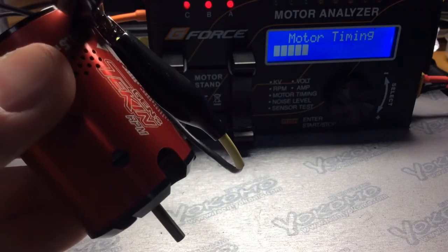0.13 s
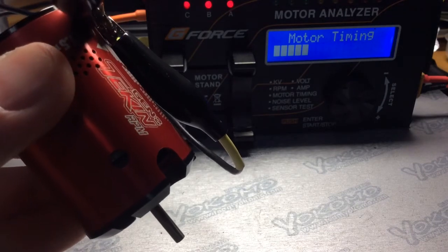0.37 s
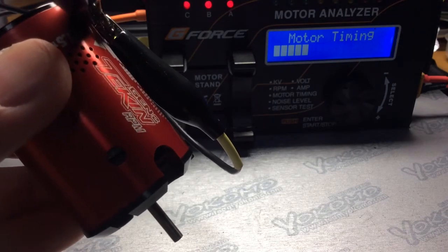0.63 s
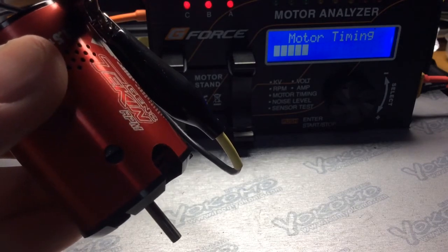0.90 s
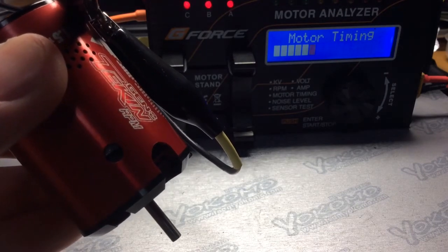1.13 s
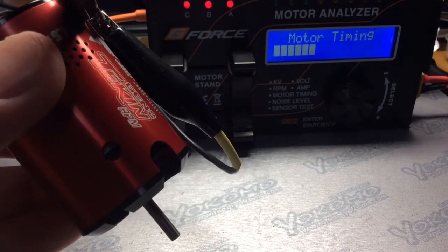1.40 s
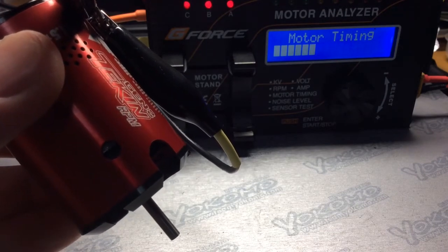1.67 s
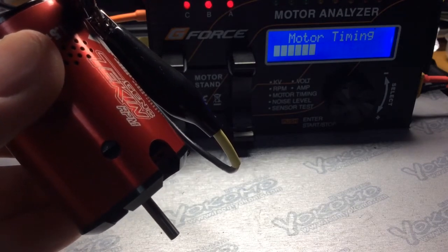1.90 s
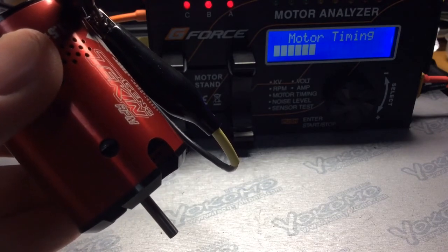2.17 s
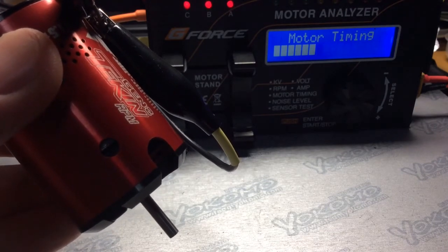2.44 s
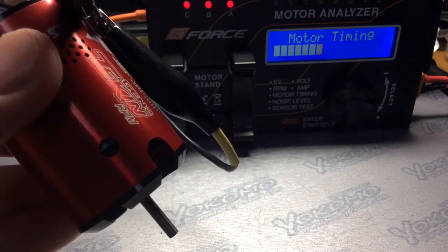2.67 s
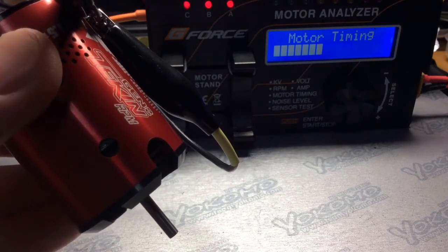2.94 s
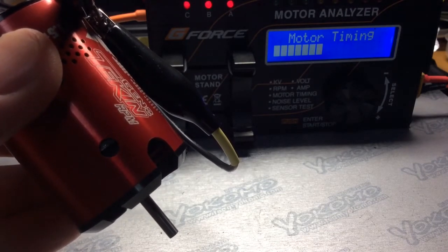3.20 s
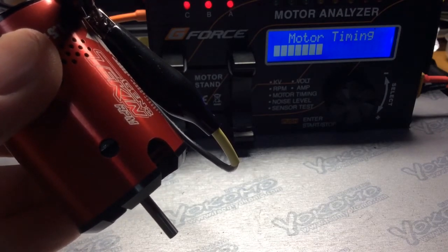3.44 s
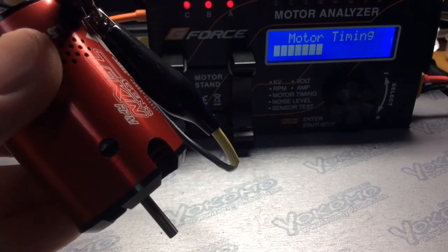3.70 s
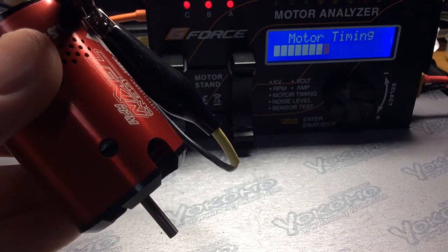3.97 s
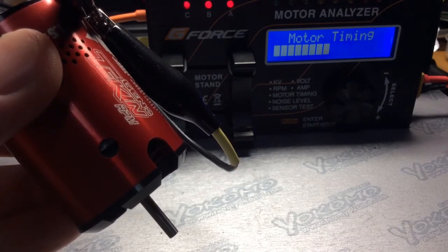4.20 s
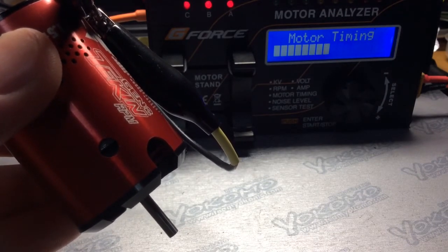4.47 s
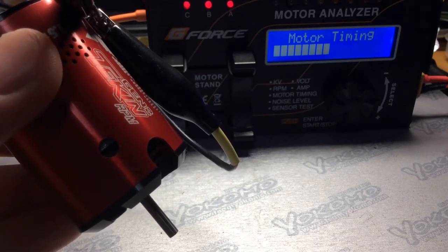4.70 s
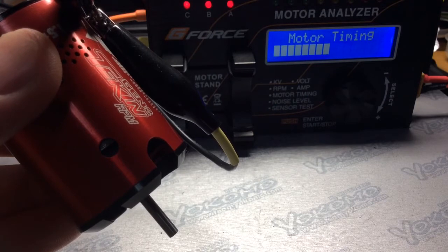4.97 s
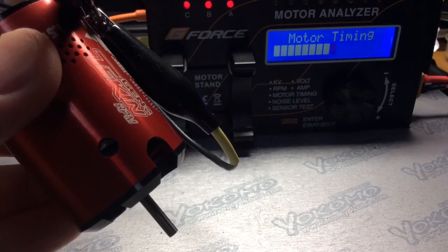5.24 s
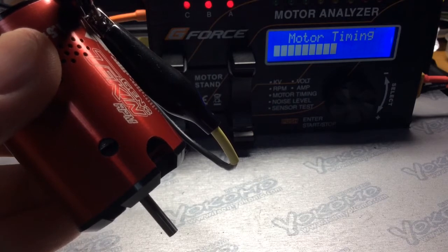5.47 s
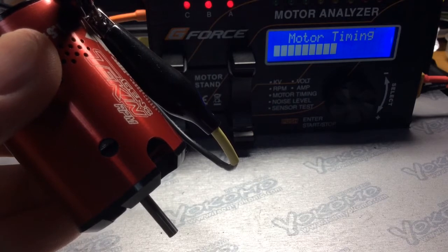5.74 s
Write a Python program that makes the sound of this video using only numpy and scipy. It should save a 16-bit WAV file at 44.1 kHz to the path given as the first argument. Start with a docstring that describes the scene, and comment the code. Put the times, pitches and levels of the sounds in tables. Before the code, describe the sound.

From 0 to about 6 seconds a small brushless motor, held close to the microphone, spins freely at a nearly constant speed of roughly 150 turns per second. The sound is already at full strength at the start and continues to the end without a ramp, click or pause. Shaft and ball bearings make its metal can ring in dense, slightly clashing combs of tones, strongest around 1 to 5 kHz, giving a gritty, metallic whine with rough beating and shimmer. In the first half second or so the bearing tones settle very slightly, then the speed only hunts minutely. Harsh rattling noise, strongest around 4 to 7 kHz, and airy hiss up to about 15 kHz throb rapidly with the rotor. A thin electrical whistle sits near 8 kHz. Behind it are weak low rumble and a very faint room hush fading over the seconds. Dry, close and centred mono.

```python
"""In a quiet room, a small brushless motor is held in a hand close to a mono microphone.
It runs unloaded at a nearly steady speed. The shaft and two ball-bearing rhythms ring the metal can as
combs of tones, and the drive's switching whistles near 8 kHz. Rattle and air hiss are coloured noise
that throbs with the turning rotor. A low rumble and a faint, fading hush fill the room behind."""
import sys
import numpy as np
from scipy import signal
from scipy.fft import rfft, irfft, next_fast_len
from scipy.io import wavfile
from scipy.ndimage import uniform_filter1d

SR = 44100
rng = np.random.default_rng(int(sys.argv[2]) if len(sys.argv) > 2 else 0)


def wav_out(sig):
    """Save sig, one row per channel (or a flat mono array), as 16-bit PCM at SR to the path in sys.argv[1]."""
    wavfile.write(sys.argv[1], SR, np.round(np.clip(np.atleast_2d(sig).T, -1, 1) * 32767).astype(np.int16))


def attenuation_scalar(level_db):
    """Turn a level in dB into a linear amplitude multiplier (20 dB per decade)."""
    decades = np.asarray(level_db, float) / 20
    return 10 ** decades


N = 258867  # length in samples

# the drive hunts gently around its set speed: start_s, shaft_speed_hz
SHAFT_SPEED = [(0, 150.87), (.3, 150.63), (.94, 150.61), (1.1, 150.66), (1.69, 150.52), (1.94, 150.72),
               (2.1, 150.43), (2.55, 150.63), (2.92, 150.85), (3.3, 150.54), (3.78, 150.92), (3.95, 150.6),
               (4.2, 150.89), (4.44, 150.53), (4.82, 150.93), (5.23, 150.5), (5.58, 150.8), (5.87, 150.7)]


def shaft_speed(t):
    """The shaft speed (Hz) moves in straight lines between the points of the table."""
    start_s, speed_hz = np.transpose(SHAFT_SPEED)
    return np.interp(t, start_s, speed_hz)


# the two bearing rhythms, as fractions of a shaft order:
# settled_share, extra_share at the start, settling_time_s, share_per_hz above the set speed
RACE_RHYTHM = (.65, .0085, 2.4, -.004)
SLIP_RHYTHM = (.195, .03, .35, .07)


def bearing_turns(t, hz):
    """Adds up the turns of the steady race and of the slipping race, whose balls skid quickly."""
    race_hz = hz * rhythm(t, hz, *RACE_RHYTHM)
    slip_hz = hz * rhythm(t, hz, *SLIP_RHYTHM)
    skids_hz = 1.476 * spread(slow(hz=11.8)[0])
    return np.cumsum(race_hz) / SR, np.cumsum(slip_hz + skids_hz) / SR


def rhythm(t, hz, settled, extra, settle_s, per_hz):
    """A bearing rhythm settles with time and leans with each swing of the speed."""
    set_hz = 150.67
    return settled + extra * np.exp(-t / settle_s) + per_hz * (hz - set_hz)


# combs of can tones, one entry per shaft order going up: level_db (rms of each tone)
SHAFT_TONES = [-79.5, -74.9, -95.9, -87.1, -78.7, -65.8, -74.4, -65.8, -66.9, -56.5, -61.5, -70.2, -80.6,
               -67.4, -72.1, -73.5, -78.8, -75.4, -92.9, -74.3, -92.9, -80.1, -78.3, -79.9, -85.0, -72.4,
               -83.0, -84.2, -81.1, -74.2, -68.9, -84.2, -67.8, -84.0, -76.4, -74.1]
# the same, shifted by one, two or three times the steady race rhythm: level_db
RACE_TONES = [-101.1, -81.3, -96.3, -78.9, -81.5, -64.1, -74.2, -61.1, -69.7, -60.6, -80.0, -62.5, -63.7,
              -61.9, -66.2, -68.7, -72.7, -64.4, -76.9, -74.4, -74.5, -73.4, -62.8, -62.5, -61.0, -71.7,
              -62.3, -71.9, -66.4, -80.6, -65.5, -72.8, -71.9, -82.8, -69.4, -76.5, -84.0, -71.8, -80.9,
              -75.6, -70.3, -82.0, -73.7, -83.5, -70.3]
RACE_TWICE_TONES = [-72.9, -79.9, -74.4, -76.3, -79.8, -74.6, -76.9, -81.8, -84.3, -74.6, -69.1, -62.1,
                    -84.1, -85.1, -62.2, -74.9, -76.0, -80.6, -68.7, -69.9, -64.1, -64.1, -65.6, -78.4,
                    -62.6, -65.3, -62.3, -74.7, -61.3, -81.4, -68.5, -84.3, -68.6, -72.7, -83.9]
RACE_THRICE_TONES = [-74.5, -74.2, -73.1, -70.3, -72.5, -71.3, -84.9, -77.9, -85.7, -81.3, -83.5, -81.1,
                     -71.9, -83.2, -73.4, -78.9, -84.2, -77.3, -76.4, -73.1, -75.7, -86.0, -86.4]
# the same, shifted by the slipping race rhythm, alone or mixed with the steady one: level_db
RACE_LESS_SLIP_TONES = [-97.8, -97.8, -78.1, -85.0, -72.1, -90.1, -71.7, -80.1, -88.5, -89.4, -88.9, -82.0,
                        -82.9, -91.3, -89.0, -94.6]
SLIP_TONES = [-96.0, -95.1, -82.8, -86.9, -67.5, -78.5, -71.6, -88.7, -76.2, -81.6, -65.2, -70.0, -68.9,
              -71.8, -65.8, -77.3, -79.9, -78.4, -95.8, -94.8, -90.7, -76.0, -73.3, -69.2, -68.7, -84.9,
              -84.0, -70.5, -68.8, -75.8, -73.7, -73.9, -71.2, -83.2, -85.3, -82.1, -74.1, -72.4, -75.4,
              -70.7, -75.2]
RACE_AND_SLIP_TONES = [-89.9, -75.3, -89.0, -89.6, -87.9, -76.8, -95.9, -80.4, -83.5, -78.5, -79.8, -63.1,
                       -68.8, -76.6, -71.7, -63.0, -70.6, -66.3, -66.5, -82.7, -84.0, -64.5, -79.0, -76.7,
                       -66.2, -66.8, -70.1, -82.4, -70.8, -81.9, -83.5]
SLIP_TWICE_TONES = [-81.5, -78.7, -70.8, -73.1, -66.3, -70.8, -62.5, -71.9, -66.1, -67.5, -79.3, -68.8,
                    -72.7, -75.9, -80.3, -87.3, -72.3, -80.6, -69.9]
RACE_SLIP_TWICE_TONES = [-85.4, -73.7, -74.9, -68.5, -71.0, -66.0, -74.4, -72.6, -65.8, -79.0, -72.2, -68.9,
                         -72.6, -68.7, -68.9, -69.7, -71.5, -73.1, -71.1, -75.3, -73.4]
RACE_TWICE_SLIP_TONES = [-75.7, -74.8, -72.1, -84.4, -84.7, -77.2, -71.8, -83.0, -71.9, -88.0, -74.6, -71.7,
                         -70.1, -75.4, -74.1, -68.3, -73.1, -75.0, -67.6, -81.0, -76.8, -74.5, -75.0]


def can_tones(turns, race, slip):
    """Rotor and bearings shake the can; the slipping race wanders, which blurs its combs."""
    # one can phase per order: neighbouring shaft and race tones beat in step
    can = rng.random(len(RACE_TONES) + 2)
    shaft = comb(turns, 0, SHAFT_TONES, order=1, waver=0.052, scatter=0, start=can)

    steady = comb(turns, race, RACE_TONES, order=2, waver=0.057, scatter=0.065, start=can[2:])
    steady += comb(turns, 2 * race, RACE_TWICE_TONES, order=13, waver=0.077)
    steady += comb(turns, 3 * race, RACE_THRICE_TONES, order=27, waver=0.13)

    blurred = comb(turns, race - slip, RACE_LESS_SLIP_TONES, order=5, waver=0.12, scatter=1)
    blurred += comb(turns, slip, SLIP_TONES, order=4, waver=0.12, scatter=0.98)
    blurred += comb(turns, race + slip, RACE_AND_SLIP_TONES, order=14, waver=0.11)
    blurred += comb(turns, 2 * slip, SLIP_TWICE_TONES, order=22, waver=0.13)
    blurred += comb(turns, race + 2 * slip, RACE_SLIP_TWICE_TONES, order=27, waver=0.15)
    blurred += comb(turns, 2 * race + slip, RACE_TWICE_SLIP_TONES, order=27, waver=0.12)

    # unequal balls add weak sidebands; of the nearest pair, the lower one is stronger
    balls = 7
    ball = np.exp(2j * np.pi * (turns + race) / balls)
    shaft *= 1 + 0.015 * ball - 0.057 / ball + 0.032 * ball ** 3
    steady *= 1 - 0.14 / ball + 0.095 * ball + 0.036 * ball ** 2 + 0.056 * ball ** 3
    return (shaft + steady + blurred).real


def comb(turns, shift, levels_db, order, waver, scatter=0.25, start=None):
    """Tones one shaft order apart, from the given order up, moved by shift and wavering together.

    Blows twice a turn keep every other tone in step, within scatter (turns), unless start
    gives the phases (turns)."""
    step = np.exp(2j * np.pi * turns)
    tone = np.exp(2j * np.pi * (order * turns + shift))
    if start is None:
        start = rng.random(2)[np.arange(len(levels_db)) % 2]
    start = start[:len(levels_db)] + scatter * rng.standard_normal(len(levels_db))
    strength = 1 + waver * spread(slow(hz=3.0)[0])
    out = np.zeros(N, complex)
    for db, phase in zip(levels_db, start):
        out += attenuation_scalar(db) * np.exp(2j * np.pi * phase) * tone
        tone *= step  # up to the next shaft order
    return np.sqrt(2) * strength * out


# the switching whistle and its sidebands: distance_shaft_orders, level_db (rms)
SWITCHING_TONES = [(-2, -60), (0, -66), (1, -72), (2, -63), (5, -72), (10, -81)]


def switching(turns):
    """The windings sing at the switching rate, split into sidebands by the turning field."""
    switch_hz = 8023.7
    carrier = switch_hz * np.arange(N) / SR
    whistle = np.zeros(N)
    for orders, db in SWITCHING_TONES:
        phase = carrier + orders * turns + rng.random()
        whistle += np.sqrt(2) * attenuation_scalar(db) * np.cos(2 * np.pi * phase)
    return whistle


# noise spectrum of the can's low and high rattle: pitch_hz, level_db (per Hz)
LOW_RATTLE = [(701, -110), (1006, -100.5), (1195, -90.5), (1300, -91), (1465, -88.5), (1706, -87.5),
              (1971, -91.5), (2123, -88.5), (2439, -88.5), (2680, -88.5), (2860, -91), (3009, -92),
              (3181, -97), (3399, -93.5)]
HIGH_RATTLE = [(3400, -96), (3750, -89.5), (3952, -81.5), (4169, -87.5), (4297, -84), (4948, -84.5),
               (5294, -84.5), (5447, -81), (5660, -92), (5800, -82.5), (6018, -81.5), (6503, -81.5),
               (6862, -84), (7599, -86)]
# throb of each on shaft orders 1 to 4: depth_share (0-1)
LOW_RATTLE_THROB = [0.26, 0.22, .06, 0.21]
HIGH_RATTLE_THROB = [0.055, 0.38, 0.067, 0.12]


def rattle(turns, shake, gust, beat):
    """The can rattles in two bands of throbbing noise, each with its own flicker in level."""
    low = throbbing(turns, LOW_RATTLE_THROB, LOW_RATTLE, attenuation_scalar(0.6 * gust))
    high = throbbing(turns, HIGH_RATTLE_THROB, HIGH_RATTLE, attenuation_scalar(0.57 * shake + 1.8 * beat))
    return low + high


# noise spectrum of the air hiss: pitch_hz, level_db (per Hz)
AIR_HISS = [(7601, -84.6), (8948, -86.4), (9350, -92.6), (9653, -96.1), (9883, -90.2), (10401, -93.2),
            (11003, -91.2), (11392, -99.2), (12109, -93.2), (13349, -91.8), (13944, -91.3), (14451, -96.2),
            (15089, -91.2), (15600, -95)]
# throb of the hiss on shaft orders 1 to 4: depth_share (0-1)
AIR_THROB = [0.027, .04, .02, 0.15]


def air_hiss(turns, shake, gust, beat):
    """Air hisses as high noise that throbs with the rotor and follows both flickers."""
    flicker = attenuation_scalar(0.66 * shake + 0.49 * gust + 0.58 * beat)
    return throbbing(turns, AIR_THROB, AIR_HISS, flicker)


def throbbing(turns, depths, spectrum, flicker):
    """Noise that swells as the rotor passes fixed points of its turn, coloured by what it rings."""
    swell = np.ones(N)
    for order, depth in enumerate(depths, start=1):
        swell += depth * np.cos(2 * np.pi * (order * turns + rng.random()))
    swell *= flicker
    swell /= np.sqrt(np.mean(swell ** 2))
    return colour(rng.standard_normal(N) * swell, spectrum)


# noise spectra of the room before they swell and fade: pitch_hz, level_db (per Hz)
ROOM_RUMBLE = [(8, -112), (34, -110), (45, -96), (56, -105), (67, -92.5), (78, -107), (91, -99), (102, -97),
               (125, -110), (140, -116)]
ROOM_HUSH = [(110, -116), (140, -107), (220, -111), (330, -108), (390, -112), (480, -108), (700, -110)]


def room(t):
    """Low rumble and a faint hush, both noise that swells slowly; the hush thins out."""
    rumble_swell, hush_swell = (spread(c) for c in slow(hz=0.4, count=2))
    rumble_db = 0.5 * rumble_swell
    hush_db = 2.5 - 1.0 * t + 1.6 * hush_swell  # starts 2.5 dB up, loses 1 dB per second
    rumble = colour(rng.standard_normal(N), ROOM_RUMBLE) * attenuation_scalar(rumble_db)
    hush = colour(rng.standard_normal(N), ROOM_HUSH) * attenuation_scalar(hush_db)
    return rumble + hush


def slow(hz, count=1):
    """Smooth random drifts of unit size at 100 steps a second, changing at up to about hz."""
    steps = rng.standard_normal((count, N * 100 // SR + 2))
    drift = signal.lfilter([1], [1, -np.exp(-2 * np.pi * hz / 100)], steps)
    return drift / drift.std(1, keepdims=True)


def spread(curve):
    """Stretches a slow curve over the whole length."""
    return np.interp(np.arange(N), np.linspace(0, N, len(curve)), curve)


def colour(x, points):
    """Gives unit white noise a spectrum in dB per Hz, silent outside the table."""
    hz, db = np.transpose(points)
    size = next_fast_len(N)
    grid = np.fft.rfftfreq(size, 1 / SR) + 1e-3  # keeps the logarithm finite at 0 Hz
    gain = attenuation_scalar(np.interp(np.log(grid), np.log(hz), db, -200, -200))
    return irfft(rfft(x, size) * gain * np.sqrt(SR / 2), size)[:N]


def scene():
    """Motor tones, switching whistle, rattle, air hiss and room, alike in both channels."""
    t = np.arange(N) / SR
    hz = shaft_speed(t)
    turns = np.cumsum(hz) / SR
    race, slip = bearing_turns(t, hz)
    shake, gust = (spread(c) for c in slow(hz=45, count=2))
    # flutter only, no slow swell
    shake, gust = (c - uniform_filter1d(c, SR // 8) for c in (shake, gust))
    beat = np.cos(2 * np.pi * (turns + slip - race))  # the two races go in and out of step
    motor = can_tones(turns, race, slip) + switching(turns)
    noise = rattle(turns, shake, gust, beat) + air_hiss(turns, shake, gust, beat)
    mono = motor + noise + room(t)
    return np.array([mono, mono])


def band_limit(x):
    """A steep low-pass at the top of the band."""
    return signal.sosfilt(signal.butter(12, 15860, fs=SR, output="sos"), x)


def record(dry):
    """A steep low-pass filter removes the sound above about 15.3 kHz."""
    edge = signal.firwin(1023, 15285, window=("kaiser", 9), fs=SR)
    mix = signal.oaconvolve(dry, edge[None], "same")
    return band_limit(mix)


dry = scene()
out = record(dry)
wav_out(out)
```